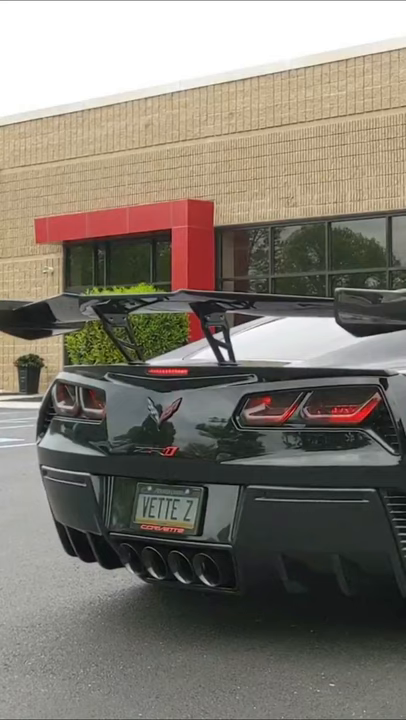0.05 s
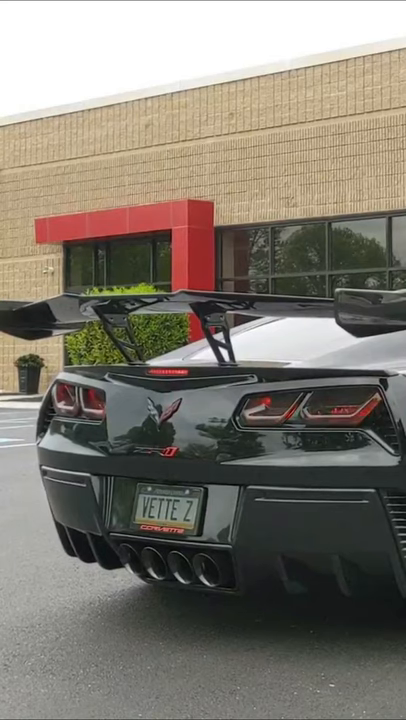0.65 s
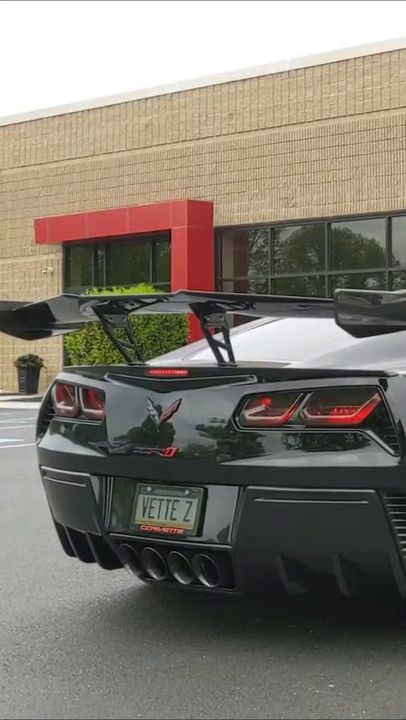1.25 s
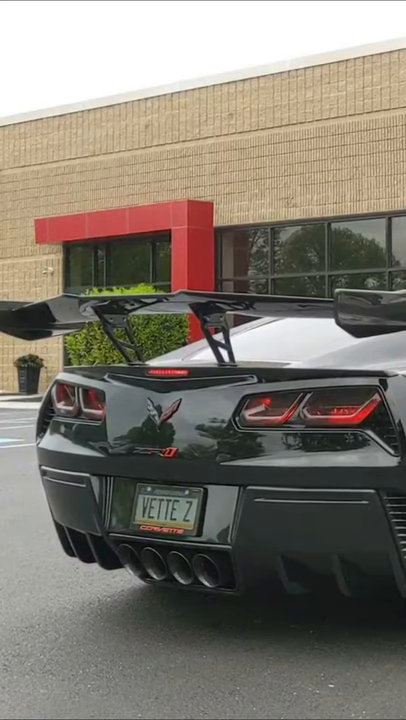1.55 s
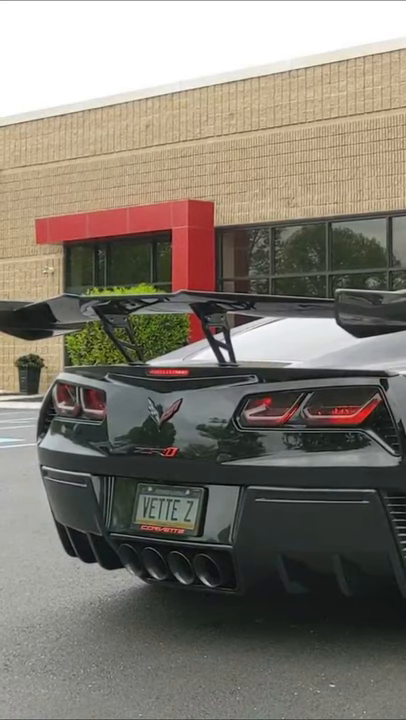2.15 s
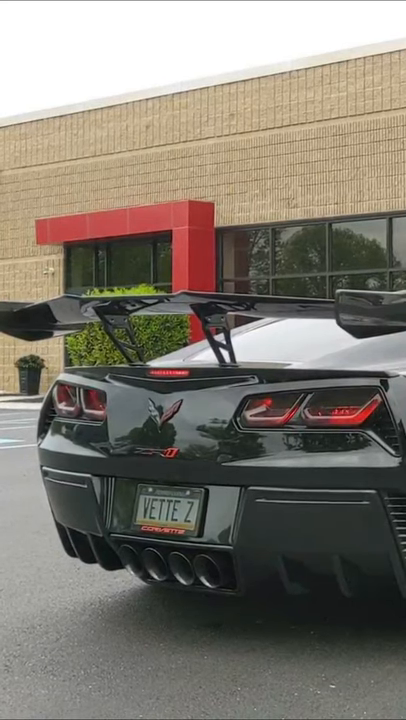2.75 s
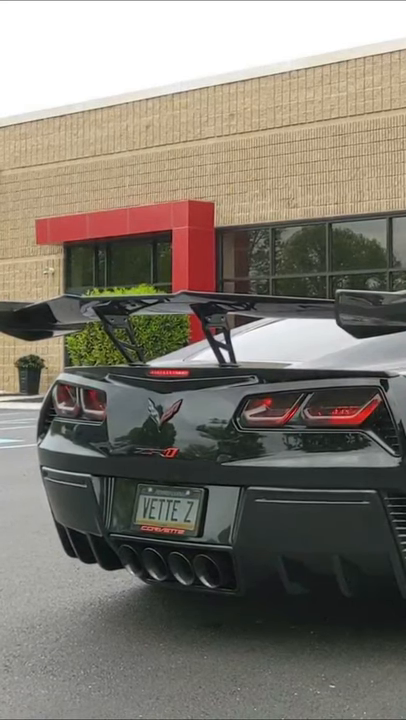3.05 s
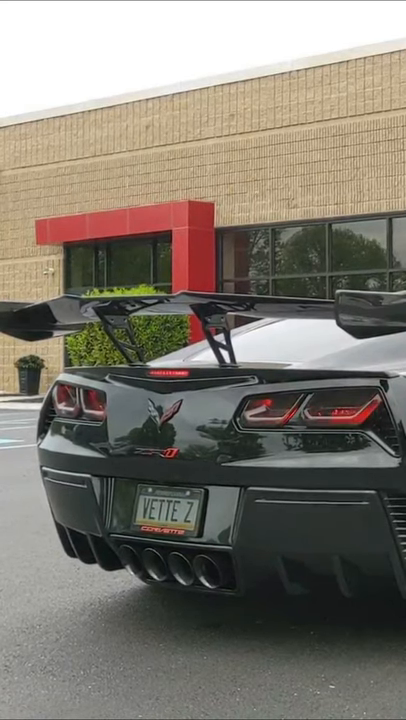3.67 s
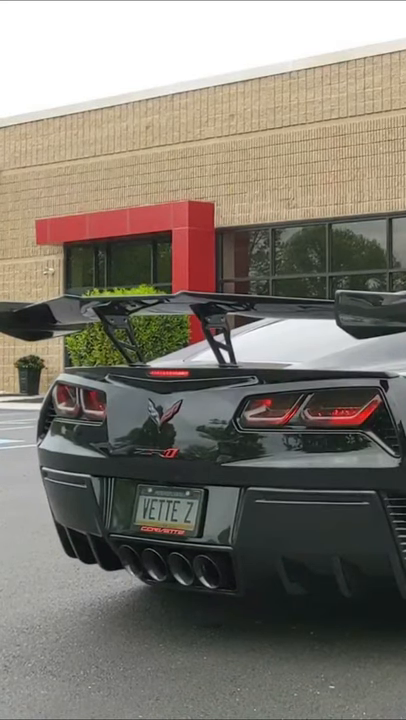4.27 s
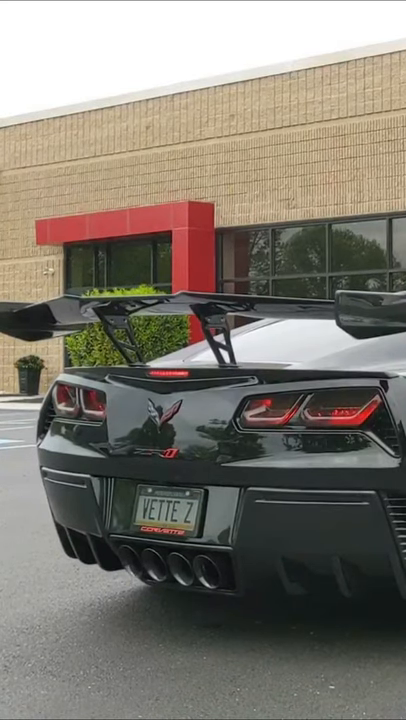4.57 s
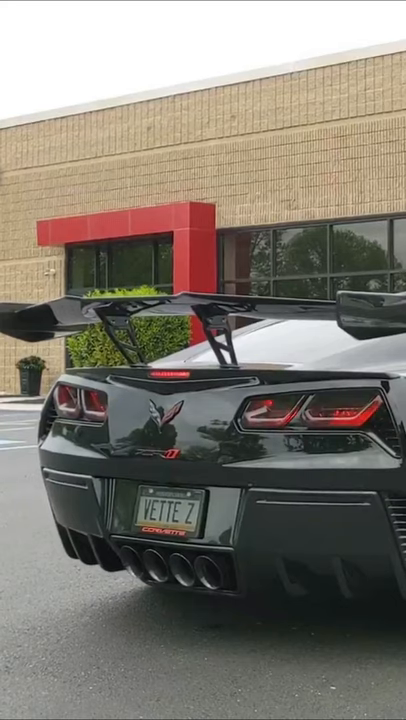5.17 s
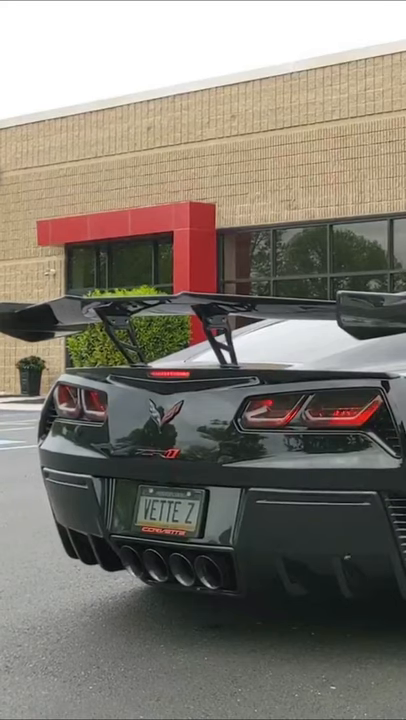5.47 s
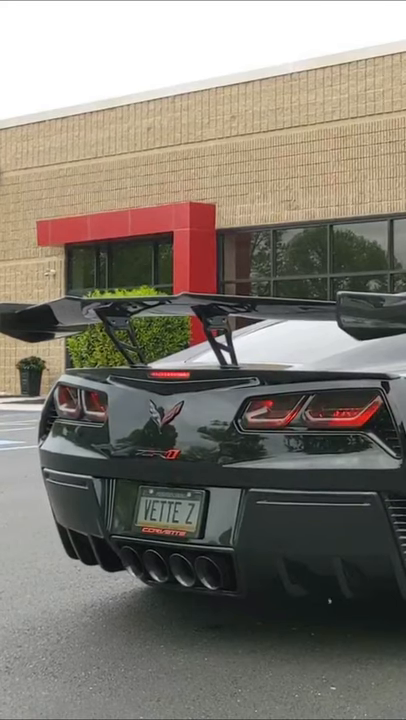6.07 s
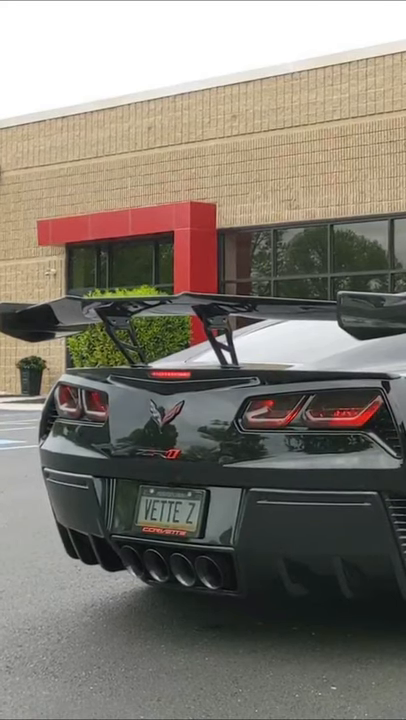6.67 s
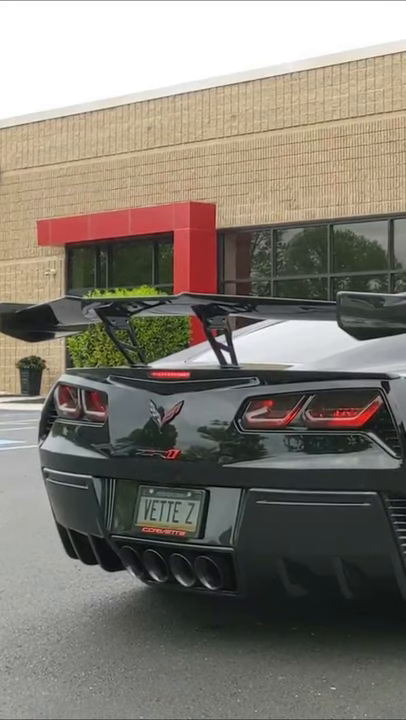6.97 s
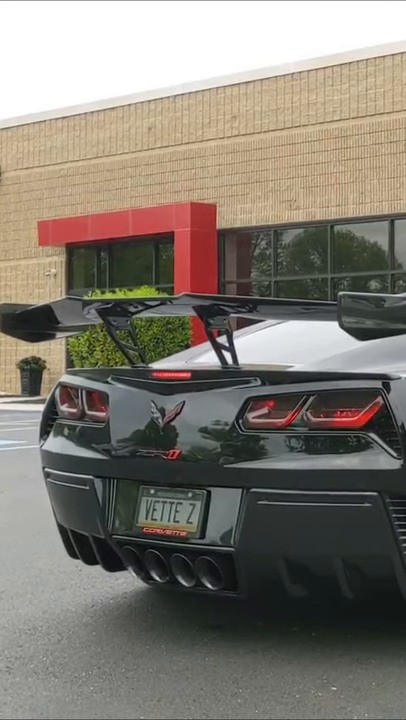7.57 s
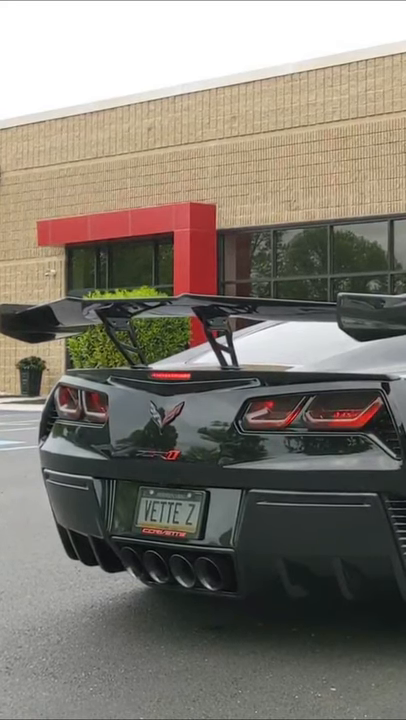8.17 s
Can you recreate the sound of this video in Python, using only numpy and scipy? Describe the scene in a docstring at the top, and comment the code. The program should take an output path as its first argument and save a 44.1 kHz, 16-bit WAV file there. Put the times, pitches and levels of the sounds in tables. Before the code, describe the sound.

A sports car's starter grinds, the engine fires and revs, then sinks with exhaust pops into a low, loping idle.

```python
"""A cross-plane V8 sports car starts in a car park, heard from a few metres behind its tailpipes.
Over distant traffic the starter clacks in, then grinds and whines as it turns the engine. At 1.2 s the
engine catches and revs up: eight uneven cylinders ring two exhaust pipes, with a rasp and a tick at
each firing. From 2.1 s it sinks, popping and misfiring, while air hisses and then a belt chirps.
By 5 s it has settled into a loping idle. A brick wall sends some of the car's sound back throughout."""
import sys
import numpy as np
from scipy import signal
from scipy.fft import rfft, irfft
from scipy.io import wavfile
from scipy.ndimage import uniform_filter1d

SR = 44100
rng = np.random.default_rng(int(sys.argv[2]) if len(sys.argv) > 2 else 0)


def wrap_up_sound(samples):
    """Save the sound to the file named by the first command line argument, as 16-bit audio."""
    columns = np.atleast_2d(samples).T
    # keep every value between -1 and 1, then stretch to whole-number steps
    tamed = np.clip(columns, -1, 1)
    steps = np.round(tamed * 32767).astype(np.int16)
    wavfile.write(sys.argv[1], SR, steps)


N = 366912
T = np.arange(N) / SR

# Tone curves of traffic, hissing air, grinding gears, exhaust thump and exhaust gas.
# Each row: frequency in Hz, relative level in dB.
TRAFFIC_TONE = [(18, -53), (30, -9.5), (235, -3), (435, -10.5), (470, -10), (608, -18.5), (917, -13.5),
                (1380, -26.5), (2770, -34.5), (3400, -26), (3870, -38.5), (14000, -50.5)]
AIR_TONE = [(1500, -26.5), (3000, -10.5), (4200, -6.5), (5000, -9), (5800, -2), (6600, -18), (8000, -14.5),
            (9600, -16.5), (12000, -19), (15500, -28.5)]
GRIND_TONE = [(240, -61), (400, -25), (458, 7.5), (602, -11), (650, 1), (1090, -22), (1350, -22),
              (1590, -21), (2510, -19), (5600, -24.5), (15000, -29.5)]
THUMP_TONE = [(20, -11), (32, -5), (43, 4.5), (55, 15), (66, -2), (87, -0.5), (118, -5.5), (135, 0),
              (160, -13), (240, -61.5)]
GAS_TONE = [(700, -7.5), (1100, 3), (2000, -16.5), (3000, -0.5), (4800, -2.5), (5800, -5), (6600, -16),
            (9000, -15), (12000, -7), (15500, -19)]
# Ringing notes of the gear housing, the tailpipe and silencer, the rasp and the ticks.
# Each row: pitch in Hz, width in Hz, relative level in dB.
HOUSING_NOTES = [(774, 29, -5.5), (959, 27, 3), (1344, 50, 7.5), (1847, 36, -4.5), (2170, 120, -17),
                 (3434, 58, -9), (3860, 31, -9), (4660, 32, -13), (4800, 30, -26), (5590, 75, -11.5)]
BARK_NOTES = [(283.8, 24, 7.5), (342, 11.4, 8.5), (446.2, 34.3, -0.5), (476.5, 27, -5), (501, 13, -8.5),
              (617.6, 20, -8), (706.6, 68, -9), (768.6, 55, -6.5), (873, 34, -19.5), (1002, 30, -17)]
RASP_NOTES = [(1180, 200, -1.5), (1417, 63, 11), (1860, 190, 2.5), (2326, 77, 8), (2732, 92, 8),
              (3310, 130, 5), (3900, 170, 0), (5400, 500, -25)]
TICK_NOTES = [(1417, 71, 2.5), (2160, 73, -4), (2595, 120, 4), (2825, 120, 0), (4030, 880, -12.5)]
# Notes of the two pipes, one for each bank (row of cylinders).
# Each row: pitch in Hz, width in Hz, relative level in dB on bank 0, then on bank 1.
PIPE_NOTES = [(175.6, 6.7, -2.5, 2.0), (191.5, 48.2, -7.5, -1.0), (218.2, 29.3, 0.5, 6.0),
              (257.94, 11.2, 4.0, -0.5), (266.6, 19.34, 5.0, -8.5), (274.55, 26.3, -1.0, -2.0),
              (348.7, 4.3, -21.5, -12.0), (292.8, 11.4, -10.5, -10.0), (332.0, 22, -24.0, -29.5)]
# Air valves opening. Each row: start in seconds, level in dB, seconds to fall by half.
HISSES = [(2.2, -52, 0.41), (2.94, -60.5, 0.082), (4.91, -54, 0.046), (5.55, -46, 0.19),
          (7.94, -44.5, 0.64)]
# Relay, solenoid and gear release. Each row: start in seconds, level in dB, pitch in Hz, fade in seconds.
CLACKS = [(0.188, -40, 3070, 0.01), (.332, -26, 5130, 0.012), (1.193, -30.5, 7720, 0.014)]
# Starter strokes, from one squeeze of a cylinder to the next.
# Each row: start in seconds, starting whine in Hz, gear level in dB, drop in dB as the gears go slack.
STROKES = [(.335, 3335, -36, 3), (.63, 4874, -33.5, 11.5), (0.791, 6810, -32.5, 23),
           (0.911, 7950, -34.5, 18), (1.028, 9000, -32, 24), (1.132, 9190, -43, 1)]
# Engine speed. Each row: time in seconds, firings per second.
SPEED = [(1.18, 36.45), (1.47, 99.03), (1.74, 118.17), (2.08, 112), (2.73, 71.38), (3.4, 57.61),
         (4.21, 46.03), (5.16, 43.09), (6.13, 43.03), (7.07, 44.13), (7.6, 42.47), (8.3, 43.68)]
# The cylinders in firing order. Each row: bank (0 or 1), delay as a share of the gap between firings.
FIRING_ORDER = [(0, -.032), (1, .463), (0, -.043), (0, .039), (1, -.034), (0, .016), (1, -.394), (1, -.208)]
# The same cylinders' strengths. Each row: push on the pipe, bark and tick, all in relative dB.
CYLINDERS = [(6, 4.5, -32), (-3.5, 2.5, -15), (-6.5, 6, -10.5), (1, -2.5, 18), (0, 0, 9.5), (5, 10, 3),
             (-9, 4, 16), (-7, 5.5, -3)]
# The bass thump. Each row: time in seconds, level in dB.
THUMP_LEVEL = [(1.2, -13.5), (1.89, -22), (2.01, -31), (2.25, -22), (3.18, -22.5), (3.22, -30), (3.43, -20),
               (3.91, -20), (4.07, -25), (6.26, -21.5), (8.3, -22.5)]
# Misfires. Each row: middle in seconds, half length in seconds, dip in dB (below zero is a lift).
MISFIRES = [(2.263, 0.021, 7.5), (2.403, 0.012, -3), (2.507, 0.011, 11.5), (2.677, 0.031, 14.5),
            (2.848, 0.018, 11.5), (2.934, 0.031, 6), (3.191, 0.028, 3), (3.308, 0.012, 5.5)]
# Extra hard firings. Each row: start in seconds, then boom, bark and crack in relative dB.
POPS = [(1.186, -15, -29, -46), (1.197, -10.5, -30, -37), (1.221, -13.5, -20, -24.5),
        (1.251, -9, -20.5, -29), (1.312, -16, -30, -36), (2.281, -5, -40, -62.5), (2.356, -12, -33, -56),
        (2.432, -4.5, -41.5, -47), (2.472, -9.5, -41, -52), (2.528, -10.5, -34, -50), (2.57, -3, -27, -42),
        (2.626, -3.5, -33, -56), (2.799, -4.5, -31.5, -56), (2.879, -6.5, -41.5, -62), (3.02, -3, -30, -50),
        (3.36, -6.5, -38, -57.5), (3.499, -10, -29, -56), (5.756, -26, -29, -48), (6.128, -33, -26, -52),
        (6.357, -30, -33.5, -52), (6.498, -23, -27, -42), (7.787, -26, -28.5, -52)]
# Stages of the start. Each row: start, rise, hold and fall, all in seconds.
STAGES = [(1.16, 0.017, 0.11, 0.11),  # catch: the first ragged firings
          (1.17, 0.15, 0.31, 0.35),  # throttle: it opens for the rev
          (2.12, 0.17, 0.82, 1.93)]  # overrun: throttle shut, lean uneven burning
# How the exhaust follows the engine.
# Each row: dB at idle, then dB added per doubling of speed, at the catch, on throttle, on the overrun.
RESPONSE = [(-17, 4, 0.5, -2.5, -2),  # drone
            (-32.5, 6, 1, 9, -1),  # bark
            (-46, 0.5, 0, 14.5, -3),  # rasp
            (-5, -3, -3, 4.5, -7),  # ticks, within the rasp
            (2.5, 0.07, 4.5, 0.1, 3.5)]  # scatter between firings, which each layer scales

PUFF_RISE_S = 0.001


def undb(db):
    """Turn decibels into a number to multiply by."""
    return 10 ** (np.asarray(db) / 20)


def curve(rows):
    """Join (time, value) points with straight lines."""
    return np.interp(T, *np.transpose(rows))


def stage(start_s, rise_s, hold_s, fall_s):
    """Rise from 0 to 1, hold, and fall back."""
    return np.interp(T, start_s + np.cumsum([0, rise_s, hold_s, fall_s]), [0, 1, 1, 0])


def unit(x):
    """Scale to an average strength (rms) of 1."""
    return x / np.sqrt(np.mean(x ** 2))


def even(x, size=8160):
    """Hold the strength near 1, averaged over about one idling engine cycle."""
    power = uniform_filter1d(np.mean(np.atleast_2d(x) ** 2, axis=0), size)
    return x / np.sqrt(np.abs(power) + np.mean(x ** 2) / 100)


def noise(alike):
    """Stereo noise; alike runs from 0 (unrelated sides) to 1 (equal sides)."""
    return np.sqrt(alike) * rng.standard_normal(N) + np.sqrt(1 - alike) * rng.standard_normal((2, N))


def colour(x, tone, size=8192):
    """Shape a sound with a tone curve."""
    hz, db = np.transpose(tone)
    grid = np.maximum(np.fft.rfftfreq(size, 1 / SR), 1)
    cepstrum = irfft(np.log(undb(np.interp(np.log(grid), np.log(hz), db))))
    # folding this in half keeps the filter from sounding before its input
    cepstrum[1:size // 2] *= 2
    cepstrum[size // 2 + 1:] = 0
    response = irfft(np.exp(rfft(cepstrum)))
    return signal.fftconvolve(np.atleast_2d(x), response[None], axes=1)[:, :N]


def ring(x, notes):
    """Make a sound ring at the given notes; neighbours swing in opposite directions."""
    return sum((-1) ** k * undb(db) * signal.lfilter(*signal.iirpeak(hz, hz / width, SR), x)
               for k, (hz, width, db) in enumerate(notes))


def band(x, low_hz, high_hz, order=3):
    """Keep what lies between two frequencies."""
    return signal.sosfiltfilt(signal.butter(order, [low_hz, high_hz], "band", fs=SR, output="sos"), x)


def pulses(times, sizes):
    """One click at each time."""
    return np.bincount(np.clip(times * SR, 0, N).astype(int), sizes, N + 1)[:N]


def fade(x, decay_s):
    """Give each click a dying tail."""
    return signal.lfilter([1], [1, -np.exp(-1 / (decay_s * SR))], x)


def soften(x, rise_s):
    """Round off each sudden start."""
    return fade(x, rise_s) / (rise_s * SR)


def car_park():
    """Distant traffic and a faint ventilation hum."""
    return undb(-43) * unit(colour(noise(0.97), TRAFFIC_TONE)) + undb(-50) * np.sin(2 * np.pi * 470 * T)


def wall(x, echo_s=0.64):
    """Tarmac and brick scatter the sound back, differently to each ear."""
    t = T[:SR // 2]
    tail = rng.standard_normal((2, len(t))) * undb(-60 * t / echo_s) * (t > 0.006)
    tail = band(tail / np.sqrt(np.sum(tail ** 2) / 2), 310, 15000, order=2)
    return signal.fftconvolve(x, tail, axes=1)[:, :N]


def air_valves(rise_s=0.032):
    """Air hisses under the bonnet: each valve opens suddenly and the flow dies away."""
    flow = sum(undb(db) * np.clip((T - s) / rise_s, 0, 1) / (1 + np.maximum(T - s - rise_s, 0) / half_s)
               for s, db, half_s in HISSES)
    return flow * unit(colour(noise(0.34), AIR_TONE))


def belt(crank, start_s=3.44, laps=8, firings_per_lap=6.6, chirp_hz=4700):
    """As the engine slows, each lap of the belt gives a falling chirp, then a lower rising squeak."""
    lap_times = np.interp(np.interp(start_s, T, crank) + firings_per_lap * np.arange(laps), crank, T)
    out = 0
    for s in lap_times:
        level = undb(-49.5 - 4 * (s - start_s))
        for delay_s, ratio, glide, length_s in [(0, 1, -0.65, 0.02), (0.055, 0.66, 1.2, 0.046)]:
            t = T - s - delay_s
            pitch_hz = chirp_hz * ratio * (1 + glide * t) + 900 * rng.standard_normal(N)
            swell = np.exp(-np.minimum((t / length_s) ** 2, 20))
            out = out + level * swell * np.sin(2 * np.pi * np.cumsum(pitch_hz) / SR)
    return out


def clacks():
    """The starter's switches and gear strike short metal blows, each with its own bright ring."""
    out = 0
    for s, db, hz, decay_s in CLACKS:
        burst = soften(fade(pulses(np.array([s]), [undb(db)]), decay_s), rise_s=0.0031)
        metal = unit(ring(noise(0.16), [(hz, 900, 0)]))
        out = out + burst * (metal + 0.66 * unit(colour(noise(0.18), GAS_TONE)))
    return out


def cranking(release_s=1.225, release_hz=10700):
    """After each squeeze the gears go slack and the motor races, until the next squeeze brakes it."""
    starts, hz, load_db, slack_db = np.transpose(STROKES)
    edges = np.append(starts, release_s)
    strokes_done = np.interp(T, edges, np.arange(len(edges)))
    k = np.minimum(strokes_done.astype(int), len(starts) - 1)
    progress = strokes_done - k
    surge_hz = 9600 * np.diff(edges)[k] * np.abs(np.sin(np.pi * progress ** 1.4)) ** 1.5  # peaks late
    whine_hz = np.interp(T, edges, np.append(hz, release_hz)) + surge_hz
    dip_db = slack_db[k] * np.exp(-((progress - 0.31) / 0.19) ** 2)
    # the gears are silent before the first stroke and die away after the release
    mute_db = 452 * np.clip(T - release_s, 0, 0.5) + 2000 * np.clip(starts[0] - T, 0, 0.1)
    return whine_hz, uniform_filter1d(load_db[k], size=1024) - dip_db - mute_db


def starter():
    """Gear teeth grind and ring their housing; the motor's whine sags at every squeeze."""
    whine_hz, gear_db = cranking()
    phase = np.cumsum(whine_hz * (1 + 0.12 * rng.standard_normal(N))) / SR
    teeth = (np.exp(-(phase / 48 % 1) / 0.63) + 0.48) * noise(0.61)
    grind = unit(colour(teeth, GRIND_TONE + [(16000, -31)]))
    gears = unit(ring(teeth, HOUSING_NOTES)) + undb(-4) * grind
    # the whine swells as it sweeps through the casing's notes
    casing_notes = [(3450, 300, -44.5), (5450, 700, -48), (7000, 500, -51), (9700, 900, -53)]
    whine = ring(np.sin(2 * np.pi * phase) + np.sin(np.pi * phase), casing_notes)
    uneven_teeth = unit(band(rng.standard_normal(N), 12, 50, order=1))
    flutter = undb(5.5 * np.minimum(uneven_teeth, 1))
    in_gear = stage(0.305, 0.07, 0.805, 0.04)
    return undb(gear_db) * band(gears, 514, 14500) + whine * flutter * in_gear


def pipe(x, bank):
    """The exhaust pipe of one bank rings at its low notes."""
    notes = np.array(PIPE_NOTES)[:, [0, 1, 2 + bank]]
    return band(ring(x, notes), 150, 390)


def pops():
    """Single hard burns boom through both pipes and bark in the tailpipe; the hottest also crack."""
    s, boom_db, bark_db, crack_db = np.transpose(POPS)
    blows = pulses(s, undb(boom_db))
    boom = pipe(blows, 0) + pipe(blows, 1)
    boom = boom / np.abs(boom).max() * undb(boom_db.max() - 1)
    bark = fade(pulses(s, undb(bark_db)), 0.012) * unit(band(ring(noise(0.9), BARK_NOTES), 480, 830))
    snaps = soften(fade(pulses(s, undb(crack_db)), 0.0067), PUFF_RISE_S)
    crack = snaps * unit(band(ring(noise(0.91), RASP_NOTES), 800, 7000))
    return boom + band(bark, 300, 1400) + crack


def misfires():
    """How many dB the exhaust sinks while cylinders fail to fire."""
    return sum(db * np.exp(-np.minimum(((T - s) / half_s) ** 2, 20)) for s, half_s, db in MISFIRES)


def gas_rasp(times, puff_db, tick_db, valve_db, tick_mix_db):
    """Each firing lets out a rasping puff of gas and a tick; the engine's valves add a finer tick."""
    puffs = soften(fade(pulses(times, undb(puff_db)), 0.026), PUFF_RISE_S)
    gas = (puffs + 0.12) * noise(0.28)
    ticks = fade(pulses(times, undb(tick_db)), 0.0074) * noise(0.3)
    valves = soften(fade(pulses(times + 0.002, undb(valve_db)), 0.006), 0.001) * noise(0.3)
    return even(unit(band(ring(gas, RASP_NOTES), 800, 3900))
                + undb(-4.5) * unit(colour(gas, GAS_TONE))
                + undb(tick_mix_db) * unit(band(ring(ticks, TICK_NOTES), 1100, 5500))
                + undb(tick_mix_db - 11) * unit(band(valves, 7300, 10500)))


def tailpipe_bark(blows):
    """Each blow and its short rush of noise ring the tailpipe and silencer, louder on the left."""
    rush = fade(blows, 0.032) * noise(0.67)
    bark = even(band(ring(unit(blows) + 1.86 * unit(rush), BARK_NOTES), 232, 1100))
    return undb([[2.6], [-2.6]]) * bark


def bass_thump(outflow):
    """The slow outflow of gas thumps; its steady part makes no sound and is taken out."""
    swings = signal.sosfilt(signal.butter(1, 14, "high", fs=SR, output="sos"), outflow)
    return even(colour(swings, THUMP_TONE))


def engine(firing_hz, crank, idle_hz=43):
    """Each firing rings its bank's pipe, thumps, barks and rasps, never quite the same way twice."""
    controls = [np.ones(N), np.log2(firing_hz / idle_hz)] + [stage(*row) for row in STAGES]
    drone_db, bark_db, rasp_db, tick_mix_db, unevenness = np.array(RESPONSE) @ np.array(controls)
    k = np.arange(1, int(crank[-1]))
    times = np.interp(k, crank, T)
    bank, lag = np.array(FIRING_ORDER)[k % len(FIRING_ORDER)].T
    push, bark_push, tick_push = np.array(CYLINDERS)[k % len(CYLINDERS)].T
    time_luck, drone_luck, gas_luck, bark_luck, tick_luck = rng.standard_normal((len(k), 5)).T
    scatter = np.interp(times, T, unevenness)
    arrivals = np.interp(k + lag, crank, T) + 0.00009 * scatter * time_luck
    sizes = undb(push + 0.79 * scatter * drone_luck)  # the long pipes even out the firings
    drone = even(sum(pipe(pulses(arrivals, sizes * (bank == b)), b) for b in range(2)))
    outflow_sizes = undb(0.039 * push + 0.33 * scatter * gas_luck)  # nearly alike for all cylinders
    thump = bass_thump(pulses(times + 0.0001 * scatter ** 2 * time_luck, outflow_sizes))
    bark = tailpipe_bark(pulses(times, undb(bark_push + 0.9 * scatter * bark_luck)))
    rasp = gas_rasp(times, puff_db=1.52 * scatter * gas_luck, tick_db=tick_push + 3.2 * tick_luck,
                    valve_db=5.2 * bark_luck, tick_mix_db=tick_mix_db)
    dip_db = misfires()
    out = (undb(drone_db - dip_db) * drone
           + undb(curve(THUMP_LEVEL) - 0.52 * dip_db) * thump
           + undb(bark_db - dip_db) * bark
           + undb(rasp_db - 0.14 * dip_db) * rasp)
    return out * np.clip(crank * 2, 0, 1)  # silent until it catches


def scene():
    """The tailpipes, the machinery under the bonnet, their echo and the car park."""
    firing_hz = curve(SPEED)
    crank = np.cumsum(firing_hz * (T >= SPEED[0][0])) / SR  # counts firings
    left, right = engine(firing_hz, crank) + pops()
    exhaust = np.array([left, np.roll(right, 2)])  # the sound reaches the left side first
    car = exhaust + belt(crank) + air_valves() + starter() + clacks()
    return car + undb(-10) * wall(car) + car_park()


def record(dry, open_s=0.068, ceiling=0.74, top_hz=15700):
    """The microphone opens after a moment, rounds the loudest peaks and cuts the highest treble."""
    opened = dry * (T > open_s)
    rounded = opened / (1 + (opened / ceiling) ** 8) ** (1 / 8)
    return signal.sosfilt(signal.ellip(10, 0.2, 80, top_hz, fs=SR, output="sos"), rounded)


dry = scene()
out = record(dry)
wrap_up_sound(out)
```